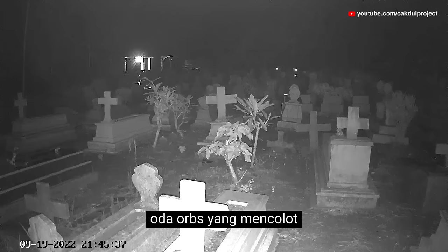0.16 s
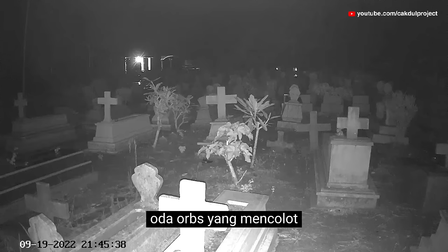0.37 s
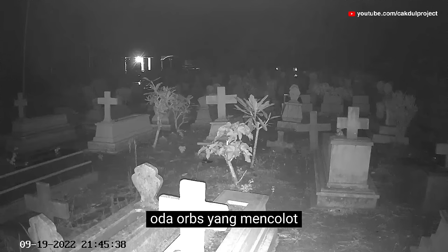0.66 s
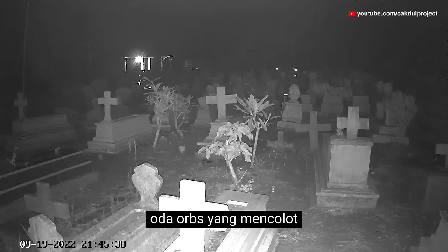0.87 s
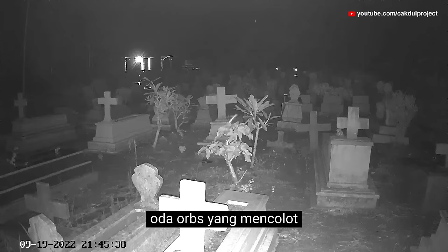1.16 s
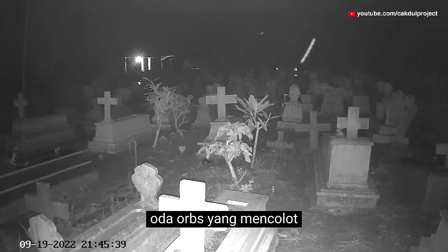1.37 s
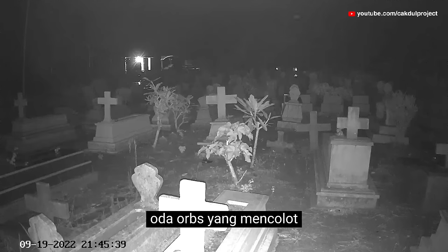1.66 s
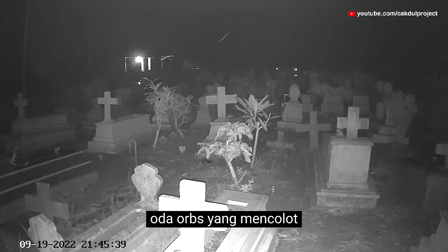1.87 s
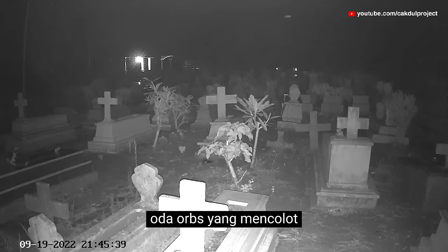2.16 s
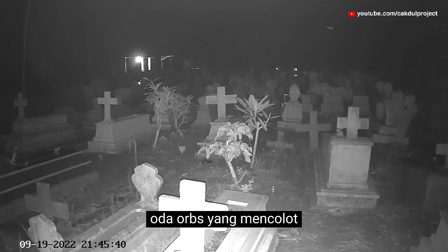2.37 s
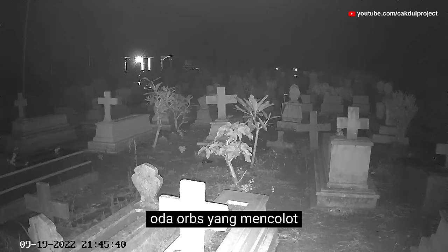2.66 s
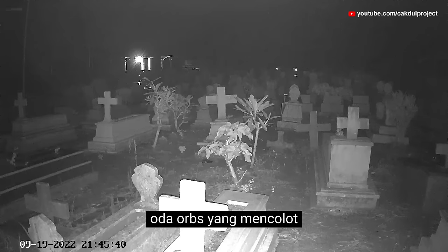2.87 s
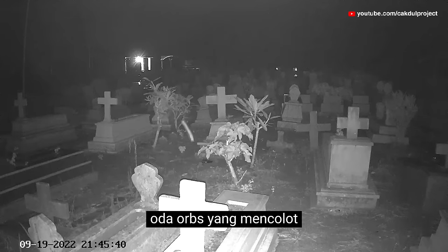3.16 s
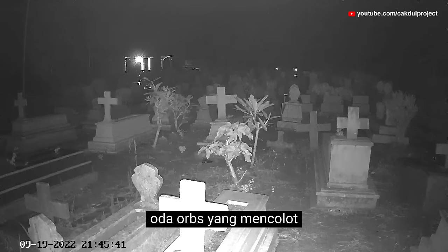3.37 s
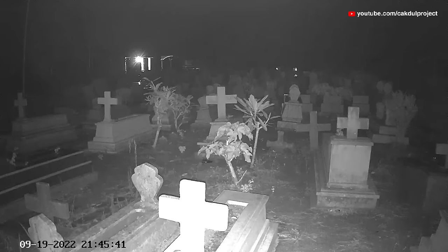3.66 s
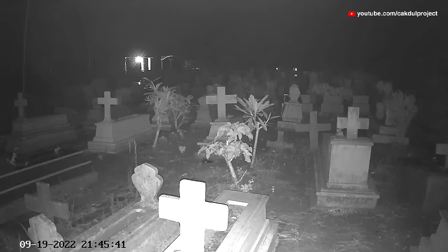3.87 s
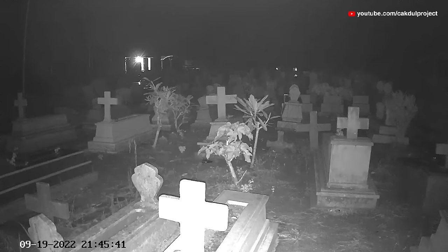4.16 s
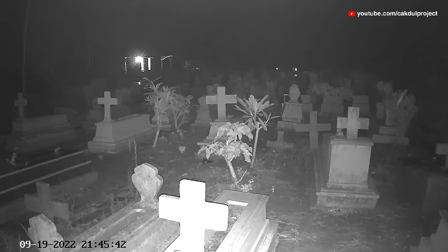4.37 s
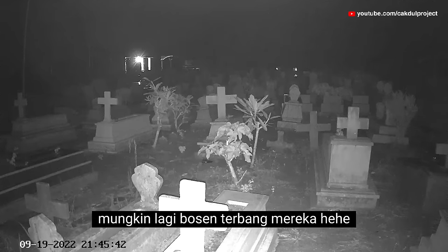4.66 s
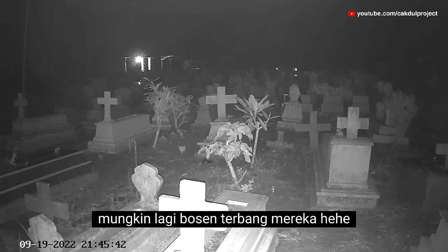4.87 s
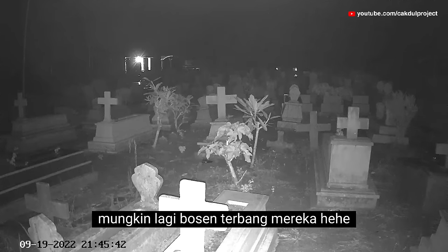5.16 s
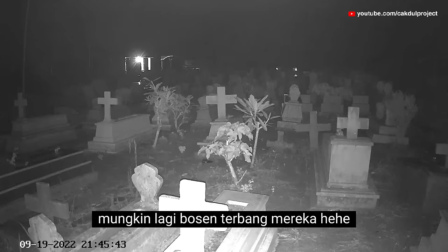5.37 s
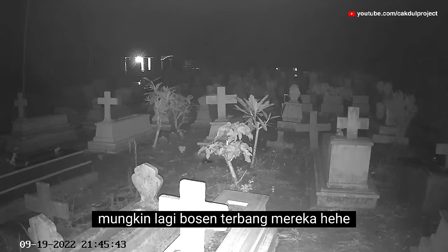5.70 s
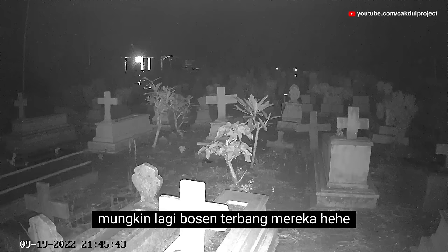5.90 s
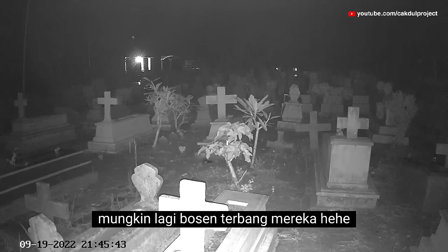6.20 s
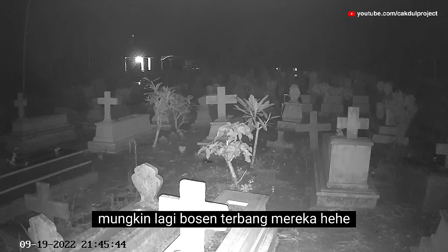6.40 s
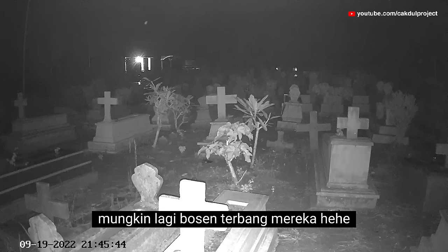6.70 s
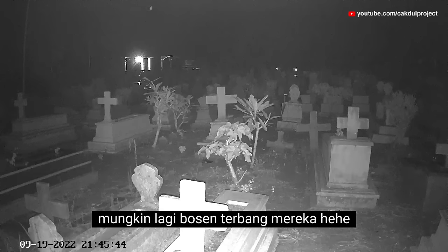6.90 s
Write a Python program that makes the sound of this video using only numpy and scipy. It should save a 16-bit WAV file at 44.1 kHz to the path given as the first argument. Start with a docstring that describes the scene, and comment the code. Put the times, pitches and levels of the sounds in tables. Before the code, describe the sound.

Night graveyard: quick soft hooting trills, about ten a second, pause then return, with dull stone echoes, low wind rumble and steady faint hiss.

```python
"""An animal, probably a frog, trills about ten arched hoots a second in two bouts, with echoes from stones.
It is night in a graveyard: further off softer trills go on, and a few faint chirps pass.
Hoots are sines that swoop up and down; chirps and the murmuring far chorus are narrow bands of noise.
Shaped noise makes the air rumbling over a small microphone, and its steady hiss."""
import sys
import numpy as np
from scipy import signal
from scipy.fft import rfft, irfft
from scipy.io import wavfile
from scipy.ndimage import uniform_filter1d

SR = 44100
rng = np.random.default_rng(int(sys.argv[2]) if len(sys.argv) > 2 else 0)


def master_out(mix):
    """Clip the mix to full scale and print it as 16-bit PCM to the path in sys.argv[1]."""
    frames = np.transpose(np.atleast_2d(mix))
    ceiling = np.clip(frames, -1, 1)
    pcm = np.round(ceiling * 32767).astype(np.int16)
    wavfile.write(sys.argv[1], SR, pcm)


N = 310464


def trill(arch_s, foot_share, skirt_db, skirt_s, skirt_lag_s, overtone_db, rough, skirt_rough, skirt_jitter):
    """Each hoot is a near sine that swoops up and down again: pure at the top, croaky on its flanks."""
    t, out = np.arange(N) / SR, np.zeros(N)
    waver, flutter, croak = drift(101.7), drift(87), drift(110)
    for start_s, top_hz, level_db, half_s in hoots():
        near = np.abs(t - start_s) < .1
        u = t[near] - start_s    # time from the top of the arch
        # the pitch arch: 1 at the top, 0 at the foot
        width_s = arch_s * np.exp(0.13 * rng.standard_normal())
        height = np.exp(-np.abs(u / width_s) ** 3)
        jitter = (0.0079 + skirt_jitter * (1 - height)) * waver[near]
        pitch_hz = top_hz * (foot_share + (1 - foot_share) * height) * (1 + jitter)
        phase = 2 * np.pi * np.cumsum(pitch_hz) / SR
        # loudness: a short swell
        reach = np.abs(u / half_s)
        swell = np.exp(-reach ** 2 / 2 * (1 + reach / 2)) * (1 + rough * flutter[near])
        # the downward swoop lingers as a soft, broken skirt after the peak
        skirt = from_db(skirt_db) * np.exp(-((u - skirt_lag_s) / skirt_s) ** 2)
        skirt = skirt * np.abs(1 + skirt_rough * croak[near])
        tone = np.sin(phase) + from_db(overtone_db) * np.sin(2 * phase)
        out[near] += from_db(level_db) * np.maximum(swell, skirt) * tone
    return out


def hoots():
    """The trill keeps a steady beat, a harder hoot being a higher one; soft hoots give way to loud ones."""
    # bouts of steady trilling: [first hoot t/s, end t/s]
    bouts = [(0.015, 3.92), (5.984, 7.0)]
    # how hard the animal trills between its loud hoots: [t/s, level before scatter and trim/dB]
    effort = [(0.0, -32), (0.45, -33.5), (0.75, -34), (1.3, -33.5), (1.6, -40), (1.9, -33), (2.1, -38),
              (2.35, -31), (2.55, -36.5), (3.9, -38), (5.98, -33.5), (6.6, -31), (7.0, -35.5)]
    # hoots that stand out, some doubled:
    # [t/s, top of the arch before jitter f/Hz, level before trim/dB, half-length/s]
    loud_hoots = [ (0.305, 745, -27, 0.0053), (0.497, 735, -29, 0.0076), (0.602, 705, -28.5, 0.013),
                  (1.836, 730, -29.5, 0.0055), (2.627, 755, -26, 0.013), (2.719, 740, -24.5, 0.0064),
                  (2.916, 745, -18, 0.0048), (3.033, 750, -25, 0.0053), (3.110, 730, -17.5, 0.0093),
                  (3.203, 750, -22, 0.0045), (3.219, 750, -20, 0.0071), (3.302, 725, -19, .012),
                  (3.394, 740, -16.5, 0.0096), (3.49, 705, -24, .009), (3.587, 745, -19.5, 0.014),
                  (3.684, 715, -30.5, 0.012), (3.777, 730, -22.5, 0.0097), (6.081, 740, -25, 0.0043),
                  (6.196, 715, -27.5, 0.0047), (6.287, 755, -21.5, 0.01), (6.316, 735, -21.5, 0.0065),
                  (6.367, 720, -24, .01), (6.564, 695, -27.5, .011)]
    period_s, soft_half_s = .0965, 0.011
    soft_pitch_hz, soft_db, pitch_hz_per_db = 715, -33, 2.5
    scatter_db, scatter_hz, scatter_s = 1.5, 12.17, 0.002035

    beats = np.concatenate([np.arange(start, end, period_s) for start, end in bouts])
    late, harder, higher = rng.standard_normal((len(beats), 3)).T
    level_db = np.interp(beats, *np.transpose(effort)) + scatter_db * harder
    pitch_hz = soft_pitch_hz + pitch_hz_per_db * (level_db - soft_db) + scatter_hz * higher
    half_s = np.full(len(beats), soft_half_s)
    soft = np.column_stack([beats + scatter_s * late, pitch_hz, level_db, half_s])
    loud = np.array(loud_hoots)
    # keep only the beats with no loud hoot within half a beat
    gap_s = np.abs(beats[:, None] - loud[:, 0]).min(axis=1)
    return np.vstack([loud, soft[gap_s > period_s / 2]])


def graveyard(x, t60, first_s, dull_hz):
    """Many small dull echoes from the stones, dying away by 60 dB in t60 seconds."""
    t = np.arange(SR) / SR
    echoes = rng.standard_normal(SR) * (rng.random(SR) < 600 / SR)    # about 600 a second
    echoes = echoes * (t > first_s) * from_db(-60 * t / t60)
    wet = signal.fftconvolve(x, echoes / np.sqrt(np.sum(echoes ** 2)))[:N]
    return signal.sosfilt(signal.butter(1, dull_hz, fs=SR, output="sos"), wet)


def far_trill(per_s, pitch_hz, level_db, half_s):
    """Further off the trilling never stops: soft sine hoots at a loose pace."""
    t, out = np.arange(N) / SR, np.zeros(N)
    # chance for each hoot: lateness in beats, level in dB, share of the pitch
    chances = rng.uniform(-1, 1, (90, 3)) * [.2, 4, .05]
    for k, (late, size_db, detune) in enumerate(chances):
        u = t - (k + late) / per_s
        near = np.abs(u) < 4 * half_s
        u = u[near]
        swell = from_db(level_db + size_db) * np.exp(-(u / half_s) ** 2 / 2)
        out[near] += swell * np.sin(2 * np.pi * pitch_hz * (1 + detune) * u)
    return out


def chirps():
    """Short raspy peeps of small creatures: each is a narrow rush of sound around its pitch."""
    # faint chirps: [t/s, pitch f/Hz, width f/Hz, level/dB, half-length/s]
    peeps = [(1.06, 2180, 220, -62, .018), (1.084, 2250, 220, -55.5, .013), (1.116, 2270, 170, -68, 0.02),
             (1.703, 3050, 130, -67, 0.003), (1.729, 3000, 130, -62, 0.0072),
             (2.234, 3000, 130, -60, 0.0067), (3.214, 1636, 239, -57, 0.018),
             (5.095, 1770, 600, -64, 0.029), (6.48, 2990, 130, -61, 0.0039)]
    t, out = np.arange(N) / SR, np.zeros(N)
    for start_s, pitch_hz, width_hz, level_db, half_s in peeps:
        phase = 2 * np.pi * pitch_hz * t
        rasp = drift(width_hz / 2) * np.sin(phase) + drift(width_hz / 2) * np.cos(phase)
        swell = np.exp(-((t - start_s) / half_s) ** 2 / 2)
        out += from_db(level_db) * swell * rms_one(rasp)
    return out


def chorus_murmur():
    """The far chorus in its low register: shaped noise whose level wanders."""
    # loudness of the low register: [t/s, level before lift and drift/dB]
    level = [(0.0, -37.5), (0.65, -41), (1.25, -38.5), (1.65, -41.5), (2.2, -41.5), (3.1, -36.5),
             (3.95, -41), (4.8, -41), (7.04, -37.5)]
    # its tone colour: [f/Hz, relative level per Hz/dB]
    colour = [(120, -76), (220, -72), (325, -69), (358, -78), (390, -67.5), (470, -70.5), (550, -66),
              (640, -76), (715, -71.5), (810, -84.5), (950, -88.5), (1300, -110)]
    level_db = in_time(level) + 1.0 + 0.93 * drift(7.5)
    return from_db(level_db) * rms_one(noise(colour))


def chorus_overtones():
    """The far chorus in its upper register: shaped noise whose level wanders a little faster."""
    # loudness of the upper register: [t/s, level before lift and drift/dB]
    level = [(0.0, -54), (1.3, -56), (1.7, -58), (2.45, -59), (3.1, -53.5), (3.75, -56.5), (5.2, -58.5),
             (6.0, -53), (7.04, -56.5)]
    # its tone colour: [f/Hz, relative level per Hz/dB]
    colour = [(750, -7.5), (950, -6), (1120, -0.5), (1255, 3), (1390, -4.5), (1490, -7), (1620, -23),
              (1900, -65)]
    level_db = in_time(level) + 1.9 + 1.02 * drift(12.0)
    return from_db(level_db) * rms_one(noise(colour))


def rumble(high_follow, low_db, high_db):
    """Eddies at the microphone: the deep lumps follow the breeze closely, the upper rumble is steadier."""
    # tone colour of the eddies: [f/Hz, relative level per Hz/dB]
    colour = [(7, 2), (15, 4), (24, -4), (36, -3), (45, -4.5), (55, -5.5), (75, -10), (100, -14),
              (145, -16.5), (200, -26), (300, -45), (600, -74)]
    eddies = rms_one(noise(colour))
    # split softly around 95 Hz
    low_pass = 1 / (1 + (np.fft.rfftfreq(N, 1 / SR) / 95) ** 4)
    deep = irfft(rfft(eddies) * low_pass, N)
    upper = eddies - deep
    # even out the deep part over about 0.2 s, so that the breeze alone sets its level
    evened = deep / np.sqrt(uniform_filter1d(deep ** 2, size=9000) + 1e-20)
    breeze_db = airflow()
    mean_db = np.mean(breeze_db)
    steady_db = mean_db + high_follow * (breeze_db - mean_db)
    return from_db(breeze_db + low_db) * evened + from_db(steady_db + high_db) * upper


def airflow():
    """Level of the moving air in dB: a slow breeze, brief buffets and random turbulence."""
    # slow swell of the breeze: [t/s, level before buffets, turbulence and lift/dB]
    breeze = [(0.0, -27), (0.4, -28.5), (0.82, -34), (1.0, -29.5), (1.95, -29.5), (2.13, -37),
              (2.45, -26.5), (3.0, -32.5), (3.27, -34), (3.75, -28.5), (4.08, -30), (4.2, -24.5),
              (4.45, -26.5), (4.55, -31.5), (5.0, -28), (5.3, -31.5), (5.75, -32.5), (7.04, -29.5)]
    # single eddies that thump the microphone: [t/s, rise above the breeze level/dB]
    buffets = [(0.09, 4), (1.66, 5), (1.92, 5), (2.24, 10), (2.55, 4.5), (2.66, 4), (2.92, 7.5), (3.11, 10),
               (3.51, 8), (4.67, 8), (4.83, 7), (5.23, 6.5), (5.4, 5.5), (6.12, 0.5)]
    buffet_half_s, turbulence_db, turbulence_per_s = 0.022, 1, 10.2
    t = np.arange(N) / SR
    buffets_db = np.zeros(N)
    for start_s, rise_db in buffets:
        buffets_db += rise_db * np.exp(-((t - start_s) / buffet_half_s) ** 2 / 2)
    return in_time(breeze) + buffets_db + turbulence_db * drift(turbulence_per_s)


def hiss():
    """The microphone's own faint, steady noise."""
    # tone colour and loudness of the hiss: [f/Hz, level per Hz/dB]
    colour = [(1000, -104), (2200, -103), (2700, -100.5), (3050, -100.5), (3500, -103.5), (5100, -104.5),
              (5750, -101), (7200, -104.5), (8400, -109), (15500, -109)]
    return noise(colour)


def from_db(db):
    """Decibels to gain."""
    return 10 ** (np.asarray(db) / 20)


def rms_one(x):
    """Scale to unit power."""
    return x / np.sqrt(np.mean(x ** 2) + 1e-20)


def in_time(rows):
    """A control curve at every sample, joined by straight lines."""
    return np.interp(np.arange(N) / SR, *np.transpose(rows))


def noise(spectrum):
    """Noise with the given power density."""
    hz, db = np.transpose(spectrum)
    bins = np.maximum(np.fft.rfftfreq(N, 1 / SR), 1)
    gain = from_db(np.interp(np.log(bins), np.log(hz), db))
    gain = gain * np.minimum(1, hz[-1] / bins) ** 2    # falls on past the last point
    return irfft(rfft(rng.standard_normal(N)) * gain, N) * np.sqrt(SR / 2)


def drift(rate):
    """Slow chance with about this many turns a second; spread 1."""
    bins = np.fft.rfftfreq(N, 1 / SR)
    return rms_one(irfft(rfft(rng.standard_normal(N)) * np.exp(-(bins / rate) ** 2), N))


def scene():
    """Callers and their echoes over chorus, rumble and hiss."""
    near = from_db(-0.74) * trill(arch_s=.028, foot_share=.64,
                                  skirt_db=-13.0, skirt_s=0.034, skirt_lag_s=0.016,
                                  overtone_db=-34.0, rough=0.15, skirt_rough=1.0, skirt_jitter=0.1601)
    far = far_trill(per_s=10.4, pitch_hz=705.0, level_db=-43.0, half_s=0.015)
    slower_higher = far_trill(per_s=4.3, pitch_hz=1257, level_db=-52.5, half_s=0.018)
    calls = near + far + chirps() + slower_higher
    echoes = from_db(-12.5) * graveyard(calls, t60=0.93, first_s=0.017, dull_hz=1800)
    chorus = chorus_murmur() + chorus_overtones()
    wind = rumble(high_follow=.55, low_db=4.5, high_db=3.5)
    return (calls + echoes + chorus + wind + hiss())[None]


def record(dry):
    """The treble is cut steeply above 15600 Hz."""
    cut = signal.ellip(12, .1, 90, 15600, fs=SR, output="sos")    # .1 dB ripple, 90 dB cut
    return signal.sosfilt(cut, dry)


dry = scene()
out = record(dry)
master_out(out)
```